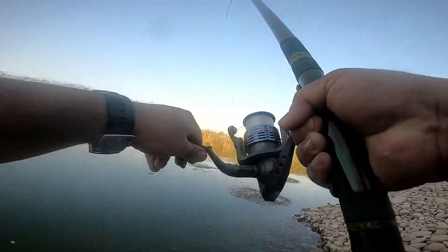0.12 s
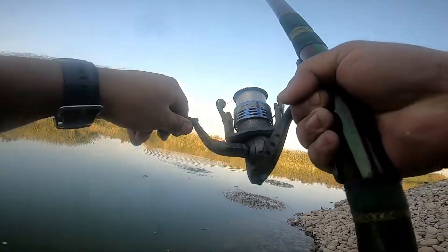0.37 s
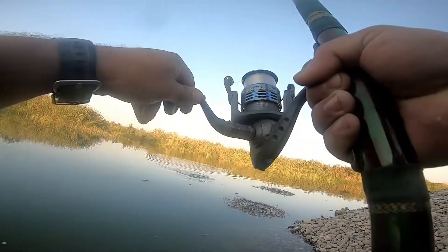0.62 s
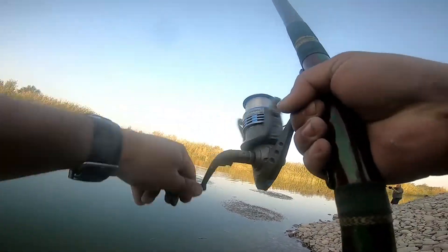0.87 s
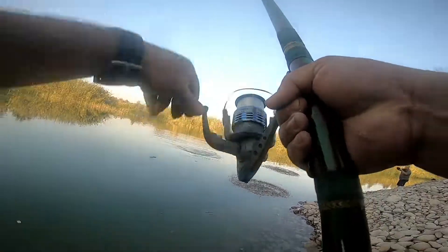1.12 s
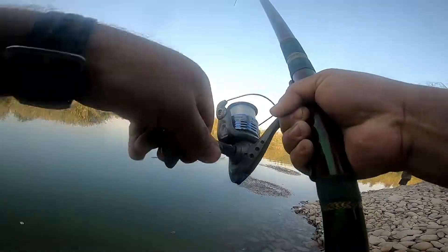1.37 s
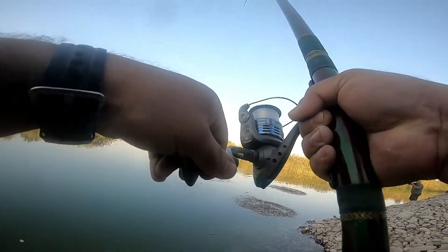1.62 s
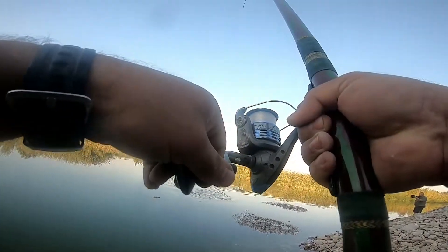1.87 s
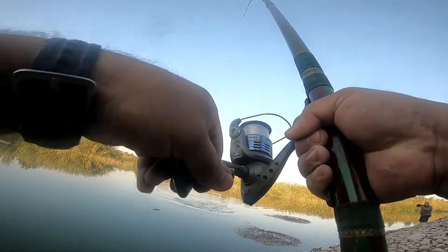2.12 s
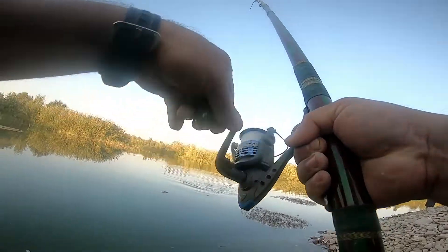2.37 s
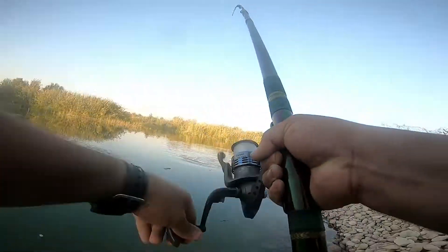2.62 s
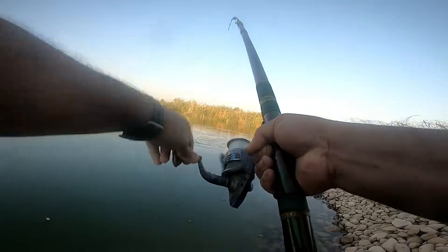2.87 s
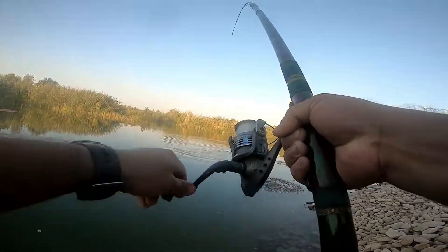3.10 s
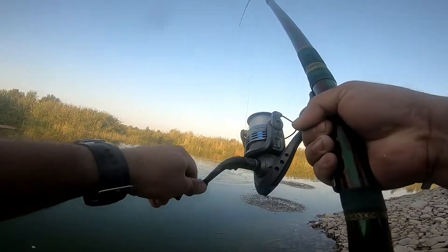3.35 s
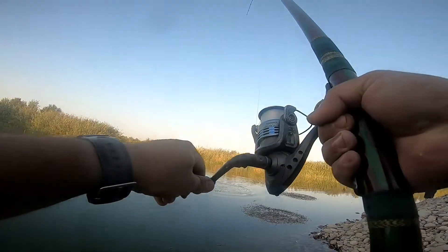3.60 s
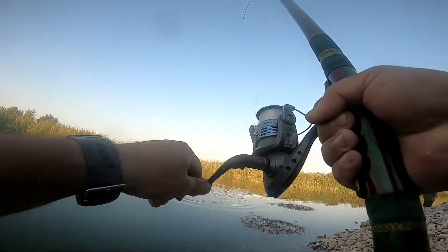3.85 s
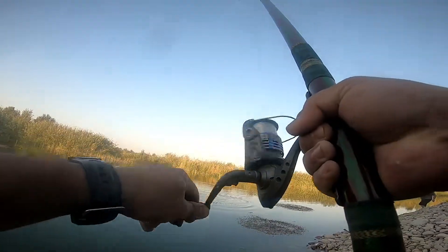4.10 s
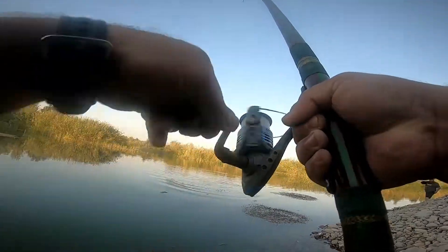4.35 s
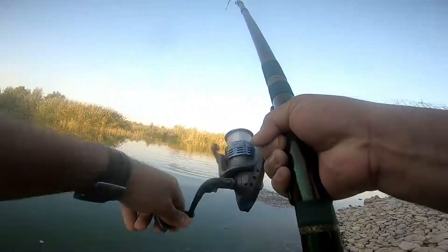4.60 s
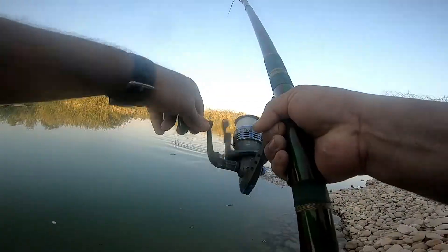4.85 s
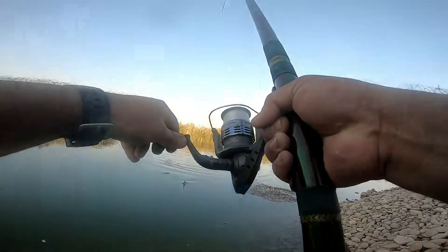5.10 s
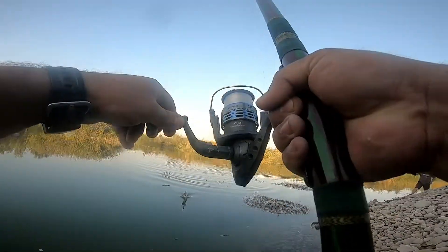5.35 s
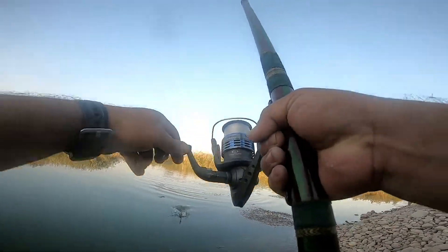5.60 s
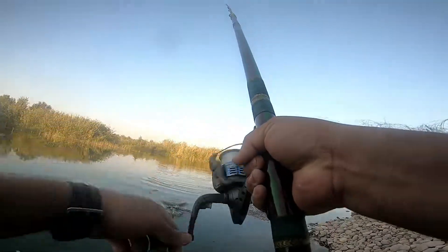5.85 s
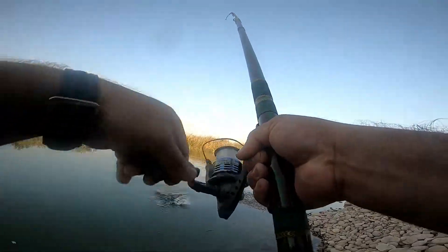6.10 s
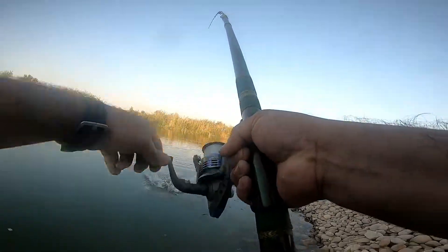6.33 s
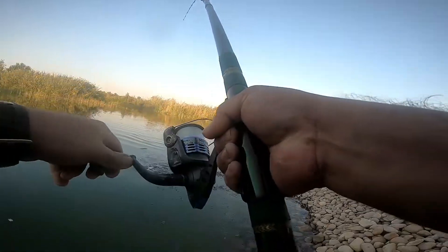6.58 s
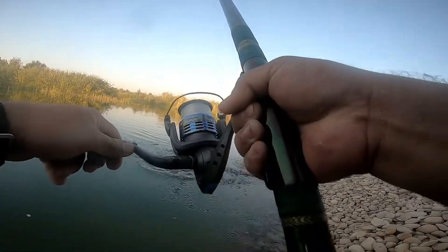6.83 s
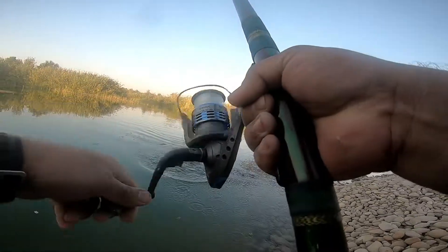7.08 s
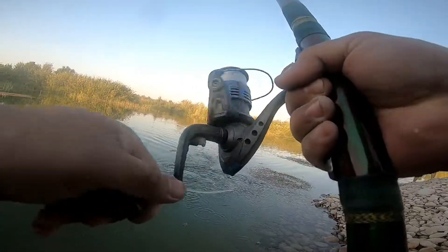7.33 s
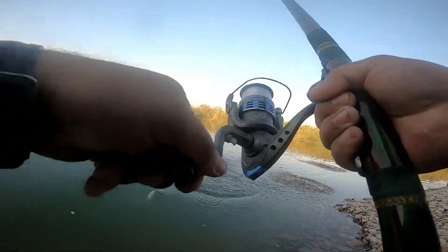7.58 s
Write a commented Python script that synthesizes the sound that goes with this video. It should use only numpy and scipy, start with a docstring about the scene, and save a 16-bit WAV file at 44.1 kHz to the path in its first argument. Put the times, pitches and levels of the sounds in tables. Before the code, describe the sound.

Close, boxed-in handling sound from a chest-mounted camera outdoors: short uneven surges of reel gear whir, dry ticks of bail and handle, woolly scuffing of a harness and dull wooden-sounding thumps. Cranking opens the scene, fades before two seconds, returns briefly around two and a half, thins to scuffs and ticks, then resumes more strongly until about seven seconds. A faint steady hush lies underneath, with little treble.

```python
"""Spinning reel on a still riverbank

A spinning reel is cranked in spells, heard through the closed housing of a chest camera with two microphones.
Grainy friction rings the gears and rotor, the harness scuffing the housing, and the rumble of the swaying body.
Struck resonances make the camera's knocks in its mount, short damped rings the reel's ticks; shaped noise makes
a steady background hush, with the microphones' own faint hiss in the treble.
The housing reaches the pair in roughly opposite polarity through the middle range."""
import sys
import numpy as np
from scipy import signal
from scipy.fft import rfft, irfft, next_fast_len
from scipy.io import wavfile
from scipy.ndimage import uniform_filter1d

SR = 44100
rng = np.random.default_rng(int(sys.argv[2]) if len(sys.argv) > 2 else 0)


def linear_from_db(decibels):
    """Turn decibels (scalar or array-like) into linear amplitude factors; 0 gives 1."""
    return 10 ** (np.asarray(decibels, float) / 20)


def dump_mix(stems):
    """Bounce the given channels to the path in sys.argv[1] as a 16-bit WAV at rate SR."""
    frames = np.atleast_2d(stems).T  # one column per channel
    limited = np.clip(frames, -1, 1)  # hard clip at full scale
    pcm = np.round(limited * 32767).astype(np.int16)
    wavfile.write(sys.argv[1], SR, pcm)


N = 340011
SIZE = next_fast_len(N + SR // 2)  # transform length, with room for rings to die away
HZ = np.fft.rfftfreq(SIZE, 1 / SR)
T = np.arange(N) / SR


def evened(x):
    """Scales to rms 1."""
    return x / np.sqrt(np.mean(x ** 2) + 1e-20)


def read(rows, axis):
    """One column of a table, interpolated over log frequency."""
    log_hz = np.log([row[0] + 1 for row in rows])
    return np.interp(np.log(HZ + 1), log_hz, [row[axis] for row in rows])


# The microphone pair inside the housing.
# Each row: frequency in Hz, likeness of the two sides from 0 to 1, lead of the left in radians.
MIC_PAIR = [(29.3, 0.7, 0.49), (108, 0, 2), (264, 0.08, 2.46), (493, 0.71, 3.98), (1020, 0.97, 2.825),
            (1480, 0.92, 2.33), (2186, 0, 1.3), (2420, 0.96, 2.58), (3200, 0.16, 2.13), (4560, 0, 4.95)]


def reversal():
    """How a vibration of the housing reaches left and right: the left is turned in phase."""
    return np.array([np.exp(1j * read(MIC_PAIR, axis=2)), np.ones(len(HZ))])


def paired(x):
    """Two unrelated drives become the spectra the pair hears, sharing more where the sides are alike."""
    own, right = rfft(x, SIZE)
    same = np.clip(read(MIC_PAIR, axis=1), 0, 1)
    left = same * right + np.sqrt(1 - same ** 2) * own
    return reversal() * [left, right]


def ring(spectra, modes, order=1, size=SIZE):
    """Left and right spectra through a sum of resonances; order 2 has steeper skirts."""
    hz = np.fft.rfftfreq(size, 1 / SR)
    shapes = np.array([(1j * hz * width / (f * f - hz ** 2 + 1j * hz * width)) ** order
                       for f, width, *_ in modes])
    # alternate signs at order 1, so that neighbours add up between their peaks
    signs = (-1.) ** (order * np.arange(len(modes)))
    left = signs * linear_from_db([mode[3] for mode in modes]) @ shapes
    right = signs * linear_from_db([mode[2] for mode in modes]) @ shapes
    return irfft(spectra * [left, right], size)[:, :N]


def grainy(per_s, spread_db, grain_s):
    """Noise in short overlapping bursts of uneven size, the same bursts at both microphones."""
    starts = rng.random(N) < per_s / SR
    size = linear_from_db(spread_db * np.minimum(rng.exponential(1, N), 4)) * starts
    burst_power = signal.lfilter([1], [1, -np.exp(-1 / (grain_s * SR))], size ** 2)
    return evened(np.sqrt(burst_power) * rng.standard_normal((2, N)))


def rubbed(level, modes, grains):
    """Grainy friction under a level curve rings a body, whose overall gain is levelled at the right."""
    impulse_ring = ring(rfft(np.ones((2, 1)), SIZE), modes, order=2)
    return ring(paired(grains * level), modes, order=2) / np.linalg.norm(impulse_ring[1])


def wandering_ring(grains, centre_hz, wander_hz, width_hz):
    """A ring of wandering pitch: shifts it down to zero, smooths twice, and shifts back."""
    noise = rng.standard_normal(N)
    wander = evened(uniform_filter1d(uniform_filter1d(noise, size=3000), size=3000))
    turn = np.exp(2j * np.pi * np.cumsum(centre_hz + wander_hz * wander) / SR)
    r = np.exp(-np.pi * width_hz / SR)
    drive = irfft(paired(grains), SIZE)[:, :N]
    low = signal.lfilter([1], np.convolve([1, -r], [1, -r]), drive / turn)
    keep_power = np.sqrt(2 * (1 - r * r) ** 3 / (1 + r * r))  # that of white noise
    return (turn * low).real * keep_power


def swells(rows, peak_db, edge, rest_db, restless_db, narrow=1):
    """Level in dB of movements that build to a peak and fade, over a restless rest."""
    t = T[::64]
    peak_s, rise_s, fade_s = np.transpose(rows)[:3, :, None]
    away = np.where(t < peak_s, (peak_s - t) / rise_s, (t - peak_s) / fade_s) / narrow
    power = linear_from_db(2 * (np.reshape(peak_db, (-1, 1)) - 10 * away ** edge)).sum(0)
    noise = rng.standard_normal(len(t))
    restless = evened(uniform_filter1d(uniform_filter1d(noise, size=30), size=30))
    rest_power = linear_from_db(2 * (rest_db + restless_db * np.minimum(restless, 1.3)))
    return np.interp(T, t, 10 * np.log10(power + rest_power))


# The gear case's main ring, whose pitch follows how hard the rotor is driven.
# Each row: rotor hiss drive in dB, pitch in Hz.
CASE_PITCH = [(-88, 1350), (-62, 1397), (-60.5, 1370)]
# Steadier resonances of the gears.
# Each row: frequency in Hz, width in Hz, right in dB, left in dB (the dB only balance the rows and sides).
GEAR_MODES = [(1306, 327, -5.5, -8.5), (2500, 750, -13, -11.5)]


def gears(whir, hiss_db):
    """Gear teeth catch unevenly and chatter into the reel body, a drifting ring above the main one."""
    teeth = evened(grainy(400, 2.6, 0.003) + 0.5 * grainy(45, 3.5, 0.004))
    chatter = teeth * whir
    main_hz = np.interp(hiss_db, *np.transpose(CASE_PITCH))
    main = linear_from_db(-1.5) * wandering_ring(chatter, main_hz, wander_hz=34.5, width_hz=210)
    body = linear_from_db(-8.0) * rubbed(whir, GEAR_MODES, teeth)
    high = linear_from_db([[-12], [-18]]) * wandering_ring(chatter, 3120, wander_hz=47, width_hz=227)
    return main + body + high


# Resonances of the rotor.
# Each row: frequency in Hz, width in Hz, right in dB, left in dB (the dB only balance the rows and sides).
ROTOR_MODES = [(1645, 180, 15.5, 13.5), (4250, 100, -2.5, -3.5), (7370, 3300, -2.5, -3)]


def rotor(hiss_db):
    """The rotor's fine rasp hisses through its resonances and a drifting ring of the bail."""
    rasp = evened(grainy(430, 2.4, 0.002) + 0.2 * grainy(40, 3.5, 0.0014))
    hiss = rubbed(linear_from_db(hiss_db), ROTOR_MODES, rasp)
    swapped = rasp[::-1] * linear_from_db(hiss_db)  # the two drives change sides
    bail = linear_from_db([[-9.5], [-6.5]]) * wandering_ring(swapped, 6038.5, wander_hz=132, width_hz=754)
    housing = signal.butter(8, 7980, fs=SR, output="sos")  # cuts the rotor steeply above this Hz
    return linear_from_db(3.5) * signal.sosfilt(housing, hiss + bail)


# Pushes on the handle.
# Each row: full effort in seconds, seconds to gain and seconds to lose the last 10 dB, gear whir drive in dB,
# rotor hiss drive in dB against the whir.
HANDLE_PUSHES = [(0.0, .05, 0.053, -54, -14.5), (0.09, 0.049, 0.023, -57, -17.5),
                 (0.205, 0.084, 0.11, -71, -2.5), (0.462, 0.027, 0.03, -56.5, -17),
                 (0.63, 0.12, 0.11, -60, -17), (0.88, 0.065, 0.17, -55.5, -28), (1.0, 0.13, 0.15, -53, -14),
                 (1.15, 0.026, 0.19, -50.5, -14.5), (1.289, 0.15, 0.22, -56, -17),
                 (1.47, 0.033, 0.13, -65, -23), (2.4, 0.048, 0.17, -57.5, -14.5),
                 (2.65, 0.22, 0.35, -52.5, -18), (2.92, 0.11, 0.078, -59, -3.5),
                 (3.16, 0.064, 0.03, -60.5, -11), (4.279, 0.083, 0.096, -55, -15.5),
                 (4.49, 0.093, 0.14, -50, -14.5), (4.7, 0.061, 0.095, -46, -17.5),
                 (4.902, 0.084, 0.066, -47.5, -14), (5.569, 0.2, 0.5, -62, -15.5),
                 (5.817, 0.027, 0.049, -47.5, -24.5), (6.001, 0.092, 0.03, -58.5, -19),
                 (6.18, 0.023, 0.075, -52.5, -23), (6.3, 0.1, 0.15, -48, -19),
                 (6.49, 0.065, 0.11, -56.5, -10.5), (6.63, 0.13, 0.15, -51.5, -22),
                 (6.9, 0.39, 0.14, -59.5, -15), (7.134, 0.1, 0.095, -54, -16)]
PUSH_EDGE, WHIR_REST_DB, HISS_REST_DB = 1.62, -74, -88.5
CASE_SHAKE_DB = -10.5  # a scuff of the harness also shakes the gear case


def reel():
    """Pushes on the handle drive the gears and rotor; scuffs of the harness shake the gears too."""
    *_, push_db, rotor_db = np.transpose(HANDLE_PUSHES)
    shake_db = [row[3] + CASE_SHAKE_DB for row in HARNESS_SCUFFS]
    shaken = linear_from_db(swells(HARNESS_SCUFFS, shake_db, SCUFF_EDGE, WHIR_REST_DB, restless_db=1.5))
    pushed = linear_from_db(swells(HANDLE_PUSHES, push_db, PUSH_EDGE, WHIR_REST_DB, restless_db=5.0))
    whir = np.hypot(pushed, shaken)
    # the hiss peaks slightly more briefly than the whir
    hiss_db = swells(HANDLE_PUSHES, push_db + rotor_db, PUSH_EDGE, HISS_REST_DB, restless_db=4.0, narrow=0.99)
    return gears(whir, hiss_db) + rotor(hiss_db)


# Harness slipping on the housing, close against the microphones.
# Each row: peak in seconds, seconds to gain and seconds to lose the last 10 dB, drive in dB, brightness in dB.
HARNESS_SCUFFS = [(0.0, .05, 0.012, -30, -24.5), (0.19, 0.053, 0.16, -53.5, -7),
                  (0.261, 0.0078, 0.14, -49, -8.5), (0.37, .015, 0.051, -63, 3),
                  (0.442, 0.022, 0.2, -51.5, -3), (0.53, .04, 0.045, -64, 3),
                  (0.59, 0.032, 0.097, -45, -14), (0.848, 0.038, 0.045, -51, -15),
                  (1.063, 0.032, 0.061, -48, -18.5), (1.2, 0.13, 0.11, -51, -18),
                  (1.345, 0.053, 0.073, -46, -21), (1.62, 0.19, 0.15, -61.5, -3),
                  (1.85, 0.41, 0.082, -66.5, -3.5), (1.998, 0.018, 0.03, -52.5, -8.5),
                  (2.19, 0.04, 0.026, -87, 5.5), (2.5, 0.097, 0.054, -54.5, -20),
                  (2.61, 0.085, 0.021, -42.5, -14.5), (2.739, 0.15, 0.52, -46.5, -17.5),
                  (2.967, 0.017, 0.016, -33.5, -13.5), (2.988, 0.018, 0.014, -37.5, -9),
                  (3.054, 0.022, 0.034, -37, -14), (3.081, 0.025, 0.022, -47, -7.5),
                  (3.2, 0.042, 0.084, -60, -9), (3.278, 0.09, 0.11, -53.5, -13.5),
                  (3.412, 0.019, 0.053, -56.5, -8.5), (3.56, 0.066, 0.2, -53.5, -13.5),
                  (3.59, .015, 0.016, -62, -27), (3.739, 0.0084, 0.023, -54, -4.5),
                  (3.904, 0.048, 0.036, -48, -9), (4.06, 0.029, 0.099, -56, -14),
                  (4.33, 0.079, 0.27, -55, -16), (4.564, 0.048, 0.066, -43.5, -12.5),
                  (4.71, 0.022, 0.14, -49, -17), (4.85, 0.27, 0.4, -56.5, -14),
                  (5.057, 0.032, 0.045, -43, -17), (5.08, 0.034, 0.01, -42.5, -5),
                  (5.262, 0.017, 0.039, -52.5, -4.5), (5.297, 0.057, 0.029, -43.5, -11),
                  (5.391, 0.016, 0.081, -45, -12.5), (5.442, 0.14, 0.057, -49.5, -11),
                  (5.766, 0.051, 0.073, -49, -12), (5.96, 0.021, 0.11, -55.5, -18),
                  (6.03, 0.056, 0.019, -57.5, -8), (6.17, 0.035, 0.03, -57.5, -8),
                  (6.366, 0.022, 0.27, -57.5, -23), (6.559, 0.28, 0.041, -51, -13.5),
                  (6.77, 0.071, 0.087, -49.5, -14.5), (7.109, 0.067, 0.041, -54.5, -13),
                  (7.26, 0.064, 0.036, -52.5, -9), (7.36, 0.012, 0.033, -60, -8),
                  (7.463, 0.035, 0.034, -51.5, -12), (7.559, 0.043, 0.077, -49.5, -12),
                  (7.7, 0.1, 0.046, -50.5, -25)]
# What a scuff rings: low, middle and high resonances of the housing.
# Each row: frequency in Hz, width in Hz, right in dB, left in dB (the dB only balance the rows and sides).
DULL_MODES = [(166, 62, 0, -1), (287.5, 97, -2.5, -4.5), (444, 93, -6.5, -7.5)]
MIDDLE_MODES = [(490.3, 69, -3, -12), (697, 150, 1.5, -5), (847, 60, -5.5, -2.5), (1116, 310, -1, -2.5)]
BRIGHT_MODES = [(1730, 150, 0.5, -12.5), (2302, 235, 6, 5), (2526, 95, -2.5, 2.5), (3100, 160, -12, -8.5),
                (3580, 200, -15, -9)]
SCUFF_EDGE, DULL_TILT, USUAL_BRIGHT_DB = 1.41, 0.22, -17


def scuffs():
    """Webbing slips over the housing in coarse grains; a duller scuff carries more weight low down."""
    *_, db, bright_db = np.transpose(HARNESS_SCUFFS)
    slips = grainy(420, 2.9, 0.0046)
    dull_db = db - DULL_TILT * (bright_db - USUAL_BRIGHT_DB)
    # (peak dB, rest dB, modes)
    bands = [(dull_db, -85, DULL_MODES), (db, -75, MIDDLE_MODES), (db + bright_db, -76.5, BRIGHT_MODES)]
    out = np.zeros((2, N))
    for peak_db, rest_db, modes in bands:
        level_db = swells(HARNESS_SCUFFS, peak_db, SCUFF_EDGE, rest_db, restless_db=8.5)
        out += rubbed(linear_from_db(level_db), modes, slips)
    return out


# Lurches of the body wearing the camera.
# Each row: peak in seconds, seconds to gain and seconds to lose the last 10 dB, rumble drive in dB.
BODY_LURCHES = [(0.1, .1, 0.095, -56), (0.49, 0.046, 0.025, -50), (0.721, 0.18, 0.031, -49),
                (0.908, 0.031, 0.036, -44.5), (1.075, 0.083, 0.066, -51.5), (1.22, 0.035, 0.15, -58),
                (1.395, 0.05, 0.019, -30.5), (1.6, 0.16, 0.059, -59), (1.88, 0.1, 0.025, -55),
                (2.41, 0.016, 0.027, -49), (2.624, 0.024, 0.05, -33), (2.957, 0.011, 0.034, -28.5),
                (3.05, 0.035, 0.03, -30.5), (3.1, .02, 0.015, -42.5), (3.283, 0.034, 0.069, -71),
                (3.9, 0.055, 0.18, -72), (4.2, 0.052, .1, -66), (4.45, 0.14, 0.11, -57),
                (4.58, 0.074, 0.068, -54), (4.679, 0.063, 0.04, -40.5), (4.8, .05, .05, -45.5),
                (4.88, 0.013, 0.15, -47.5), (5.0, 0.055, 0.024, -40.5), (5.105, 0.035, 0.022, -40.5),
                (5.4, 0.021, 0.054, -40.5), (5.9, 0.12, 0.22, -62), (6.41, 0.046, 0.17, -55),
                (7.15, 0.14, 0.25, -53.5), (7.65, 0.037, 0.15, -49)]
# The deepest rumble, then the upper one.
# Each row: frequency in Hz, width in Hz, right in dB, left in dB.
RUMBLE_MODES = [(33.4, 30, -0.43, -0.5), (73.5, 100, -1.7, -8.5)]
LURCH_EDGE, SWAY_REST_DB = 0.9, -70.5
DEEP_SHARE, DEEP_REST_DB = 0.79, -71.5  # the deepest rumble follows a hard lurch only in part


def sway():
    """The swaying body pushes the harness in slow lumps, which rumble in two low resonances."""
    lurch_db = [row[3] for row in BODY_LURCHES]
    sway_db = swells(BODY_LURCHES, lurch_db, LURCH_EDGE, SWAY_REST_DB, restless_db=5)
    deep_db = DEEP_REST_DB + DEEP_SHARE * (sway_db - SWAY_REST_DB)
    lumps = grainy(79, 3.0, 0.019)
    deep_mode, upper_mode = RUMBLE_MODES
    deep = linear_from_db(deep_mode[2]) * rubbed(linear_from_db(deep_db), [deep_mode], lumps)
    upper = linear_from_db(upper_mode[2]) * rubbed(linear_from_db(sway_db), [upper_mode], lumps)
    return deep + upper


# Steady background hush, with the microphones' own faint hiss in the treble.
# Each row: frequency in Hz, density in dB per Hz before the whole is levelled.
HUSH_SPECTRUM = [(35, -30), (60, 0), (102, -26.5), (166, 5), (366, -6), (468, -9), (561, -13), (767, -1.5),
                 (965, -4.5), (1260, -13.5), (1890, -51), (2420, -24.5), (3050, -23), (3960, -34.5),
                 (6710, -32), (10000, -40.5), (14400, -43)]


def background_hush():
    """A faint smooth hush and the microphones' own hiss: steady noise shaped in frequency."""
    spectra = paired(rng.standard_normal((2, N))) * linear_from_db(read(HUSH_SPECTRUM, axis=1))
    return linear_from_db(-59) * evened(irfft(spectra, SIZE)[:, :N])


# Camera knocking in its mount, at the microphones' own housing.
# Each row: start in seconds, mount drive in dB, mount pitch in Hz, then shell, door, back, lid, clip and strap
# in dB against the mount, by where the blow lands.
CAMERA_KNOCKS = [(0.005, -31, 285, -1.5, 6, -11, -12.5, -31.5, -14.5),
                 (0.239, -55, 269, -7, -8, 2, -19, -31, -20),
                 (0.271, -26.5, 246, -6.5, -7.5, -10.5, -21, -24, 1),
                 (0.586, -24, 263, -10, -8.5, -4.5, -20.5, -27, -2),
                 (0.667, -22, 277, -27, -10, -5.5, -23.5, -32.5, -2.5),
                 (1.355, -18.5, 277, -20, -14.5, -6.5, -24, -41.5, -6.5),
                 (2.508, -51, 269, -7, -18, -11, -19, -20, -20),
                 (2.681, -35.5, 269, -5, -16, -8, -15, -25, -20),
                 (2.824, -24.5, 265, -4, -3.5, -8, -15.5, -40, 1),
                 (3.039, -38, 269, -14, -6, -13, -22, -47, -23),
                 (3.552, -61.5, 269, -15, -16, 11, -12, -8.5, -20),
                 (3.654, -31, 254, -23, -10, -11, -34.5, -44.5, 0),
                 (3.735, -64.5, 269, -5, 0, 12.5, -2, -10, -20),
                 (4.077, -34, 280, -9.5, -2.5, -14, -24, -52, -31),
                 (5.044, -52, 269, -6, -11, -15, -10, -28, -20),
                 (5.387, -52, 269, -17, -8, -10, -6, -15, -8),
                 (5.482, -26, 260, -5.5, -6.5, -2.5, -21, -56, 2),
                 (6.444, -27.5, 277, -20, -9, -7.5, -26.5, -60, -0.5),
                 (6.495, -34, 269, -5, -8.5, -14, -45, -47, -13),
                 (7.55, -68, 269, -3, -10, -4, 1, -20, -20), (7.636, -45, 269, 6, 6, 1, -20, -47, -15)]
# What a knock rings, one table a part; each knock shifts the pitches.
# Each row: frequency in Hz, width in Hz, right in dB, left in dB.
STRAP_MODES = [(61.4, 15.5, -11.5, -24.5), (101, 57, 0, -27), (189, 53, -3, -12.5)]
MOUNT_MODES = [(269, 48.7, 5.5, -11.5)]
SHELL_MODES = [(500, 37.5, 5.4, 0.55)]
DOOR_MODES = [(578.6, 19.6, 1, -9.5)]
BACK_MODES = [(667, 38, 3.5, -4), (862, 50, -2.5, -3.5)]
LID_MODES = [(1097, 150, 24.4, 25.3), (1196, 93, 16.8, 8.4), (1337, 30, 1, 3.4)]
CLIP_MODES = [(1706, 32, 8, -2), (2290, 80, 3.5, 8.5), (2750, 97, 4.5, 6.5), (2870, 90, 5, -1),
              (3800, 490, -6, 1), (5160, 590, -0.5, -16.5), (6080, 420, -10, -11.5)]
KNOCK_SIZE = 8192  # samples a knock may ring


def knocks():
    """A contact and its bounce strike every part; strap, heavy mount and loose clip answer latest."""
    out = np.zeros((2, N + KNOCK_SIZE))
    count, t = len(CAMERA_KNOCKS), np.arange(400) / SR
    rattles = rng.standard_normal((count, 400)) * np.exp(-t / 0.003)
    bounces_s = 0.00292 * (1 + 0.17 * rng.uniform(-1.1, 1, count))
    knock_hz = np.fft.rfftfreq(KNOCK_SIZE, 1 / SR)
    left = -np.exp(-2j * np.pi * knock_hz * 0.0001)  # reversed, and 0.1 ms late
    sides = np.array([left, np.ones(len(knock_hz))])
    # (modes, direction, s late, bounce share, rattle share, contact cut-off Hz)
    parts = [(STRAP_MODES, 1, 0.0028, 0.25, 0.006, 560), (MOUNT_MODES, 1, 0.0024, 0.25, 0.006, 560),
             (SHELL_MODES, -1, 0.0008, 0.3, 0.015, 1000), (DOOR_MODES, 1, 0.0008, 0.15, 0.015, 1000),
             (BACK_MODES, -1, 0.0006, 0.2, 0.015, 1200), (LID_MODES, 1, 0.0001, 0.45, 0.02, 1330),
             (CLIP_MODES, 1, 0.002, 0.3, 0.06, 6800)]
    # each part's pitch varies a little at random from knock to knock
    strays = 1 + 0.02 * rng.uniform(-0.84, 1, (count, len(parts)))
    for row, rattle, bounce_s, stray in zip(CAMERA_KNOCKS, rattles, bounces_s, strays):
        start_s, db, mount_hz, *body_db, strap_db = row
        parts_db = [strap_db, 0, *body_db]
        stray[:2] = mount_hz / MOUNT_MODES[0][0]  # strap and mount share their tension
        for part, part_db, shift in zip(parts, parts_db, stray):
            modes, way, late_s, bounce, loose, cut_hz = part
            force, at = np.zeros(KNOCK_SIZE), round(late_s * SR)
            force[at] = 1
            force[at + round(bounce_s * SR)] = -bounce
            force[at:at + 400] += loose * rattle
            soft = signal.sosfilt(signal.butter(6, cut_hz, fs=SR, output="sos"), force)
            peaked = []  # a wide ring starts louder, so its width is taken out of its level
            for hz, width, right_db, left_db in modes:
                width_db = 20 * np.log10(2 * np.pi * width / SR)
                peaked.append((hz * shift, width, right_db - width_db, left_db - width_db))
            blow = way * linear_from_db(db + part_db)
            struck = ring(rfft(soft) * sides, peaked, size=KNOCK_SIZE)
            out[:, round(start_s * SR):][:, :KNOCK_SIZE] += blow * struck
    return linear_from_db(9.0) * out[:, :N]


# Ticks of the reel's bail and handle.
# Each row: start in seconds, level in dB before a tilt between the sides, pitch in Hz.
REEL_TICKS = [(0.178, -40, 2610), (0.37, -42, 2270), (0.98, -32, 1420), (1.306, -32, 1490),
              (1.307, -38, 3020), (1.468, -47, 3210), (1.544, -42, 1290), (1.152, -50, 4250),
              (1.212, -47, 6100), (1.905, -50, 2420), (3.378, -45, 2500), (3.379, -43, 3300),
              (3.476, -45.5, 3380), (3.476, -52, 2410), (3.556, -42, 1430), (3.575, -35, 1320),
              (3.752, -38.5, 1390), (4.005, -44, 1430), (4.004, -39, 2490), (4.271, -38.5, 1350),
              (4.293, -41, 3180), (4.293, -44, 6150), (4.434, -58, 6000), (4.85, -51, 6100),
              (4.819, -45, 6000), (7.118, -55, 6100), (4.818, -36.5, 1490), (4.821, -47, 3170),
              (5.826, -47, 2860), (5.857, -33, 1400), (6.161, -35.5, 1286), (6.164, -39.5, 3130),
              (6.258, -39, 1520), (6.302, -29, 1356), (6.944, -43, 1400), (7.358, -41.5, 1420),
              (7.462, -42.5, 2310)]


def ticks():
    """Each tick is a short damped ring with a faint sharp edge; fainter ones fall at random."""
    out, t = np.zeros((2, N + 900)), np.arange(900) / SR
    faint = [(when * T[-1], -53.5 + 8 * (loud - 0.5), np.interp(pitch, (0, 1), (1890, 3300)))
             for when, loud, pitch in rng.random(size=(16, 3))]
    every = list(REEL_TICKS) + faint
    tilts_db = rng.uniform(-4.5, 1.5, len(every))
    for (start_s, db, hz), tilt_db in zip(every, tilts_db):
        edge = rng.standard_normal((2, 900)) * np.exp(-t / 0.00044)
        decay = np.exp(-t / 0.003 * np.sqrt(hz / 1400))  # higher ticks die sooner
        tone = np.sin(2 * np.pi * hz * t) * decay * (1 - np.exp(-t / 0.00093))
        out[:, round(start_s * SR):][:, :900] += linear_from_db([[db + tilt_db], [db - tilt_db]]) * (tone + 0.17 * edge)
    low_pass = 1 / (1 + (HZ / 7500) ** 6)  # the housing muffles the top
    return irfft(rfft(out[:, :N], SIZE) * low_pass * reversal(), SIZE)[:, :N]


def scene():
    """Everything at the two microphones."""
    return reel() + scuffs() + sway() + background_hush() + knocks() + ticks()


def roll_off(x):
    """The treble ends steeply here."""
    return signal.sosfilt(signal.butter(12, 14450, fs=SR, output="sos"), x)


def record(dry):
    """The finished mix of the two microphones, as it is kept."""
    return roll_off(dry)


dry = scene()
out = record(dry)
dump_mix(out)
```